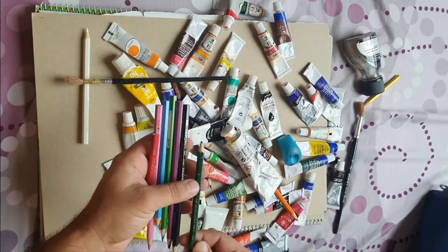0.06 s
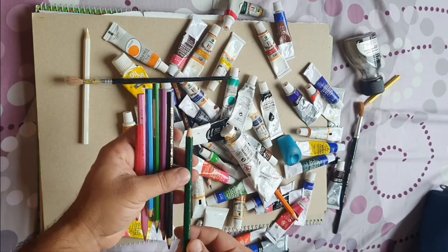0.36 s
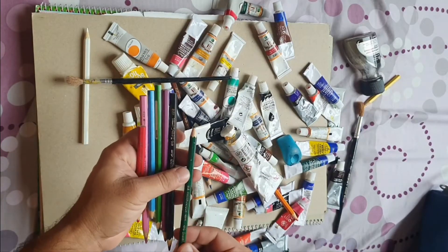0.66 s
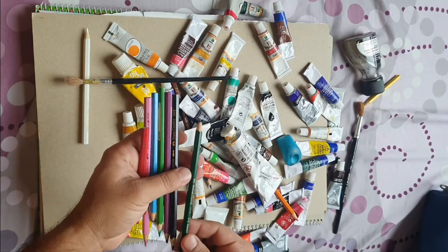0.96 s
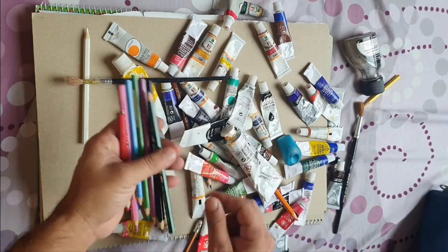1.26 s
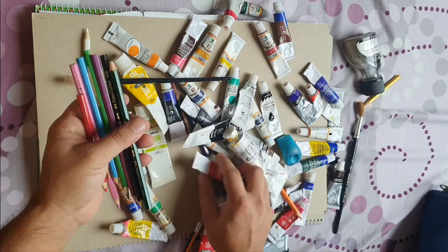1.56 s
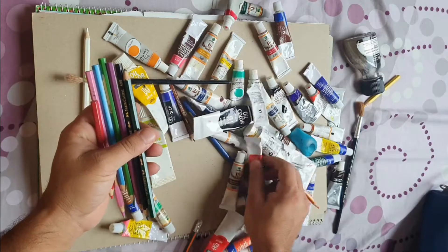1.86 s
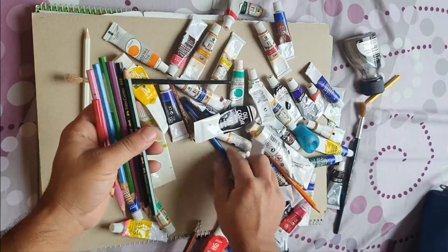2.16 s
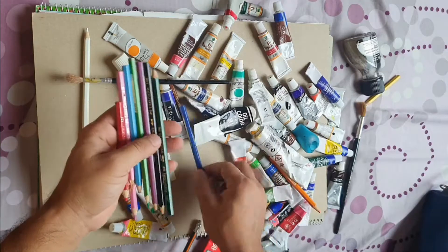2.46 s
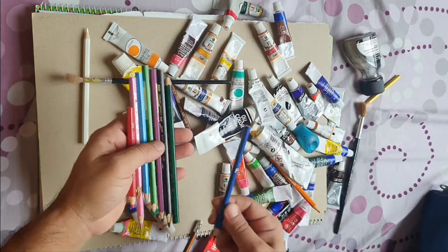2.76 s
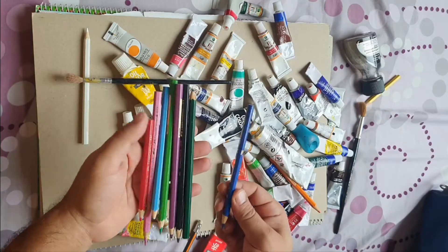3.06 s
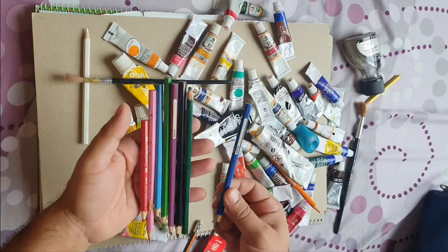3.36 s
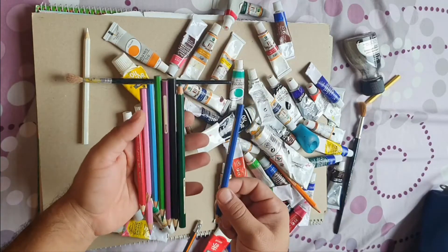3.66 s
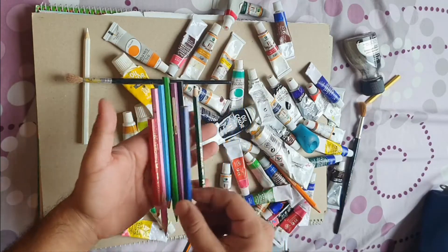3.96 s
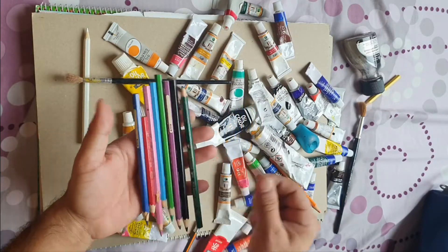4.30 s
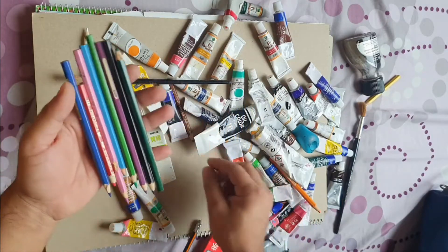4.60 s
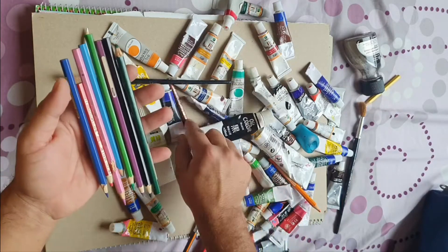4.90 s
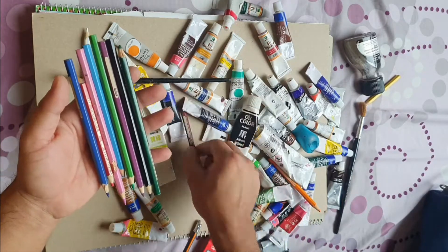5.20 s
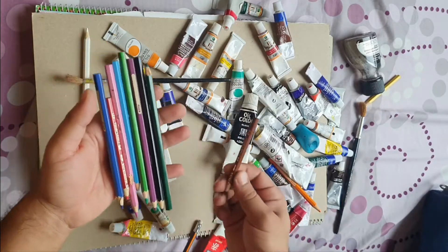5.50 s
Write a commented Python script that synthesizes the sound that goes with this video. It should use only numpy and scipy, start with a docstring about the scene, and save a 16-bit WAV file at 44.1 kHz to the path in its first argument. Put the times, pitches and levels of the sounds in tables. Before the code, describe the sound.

Close rummaging through foil paint tubes on a cardboard pad, with a few light pencil clicks and a low room hum.

```python
"""Sorting art supplies

A stereo microphone close over a sketch pad in a small, hard-walled room. Wooden pencils click together
in the palm. Twice the fingers dig through a heap of paint tubes: foil crinkles, caps tick, and the tubes
knock and scrape on the cardboard. Behind are a low hum, faint room resonances, air and a thin whistle."""
import sys
import numpy as np
from scipy import signal
from scipy.fft import rfft, irfft
from scipy.io import wavfile
from scipy.ndimage import uniform_filter1d

SR = 44100
rng = np.random.default_rng(int(sys.argv[2]) if len(sys.argv) > 2 else 0)


def digitize_waveform(pressure):
    """Quantize a signal to 16-bit integers and store it at the path in sys.argv[1].

    Rows of a 2-D input are taken as channels; values are limited to [-1, 1].
    """
    field = np.atleast_2d(pressure).T
    bounded = np.clip(field, -1, 1)
    quanta = np.round(bounded * 32767).astype(np.int16)
    wavfile.write(sys.argv[1], SR, quanta)


N = 253134
TOP_HZ = 15800  # upper edge of the recorder's band


def undb(db):
    """Decibels to amplitude."""
    return 10 ** (np.asarray(db) / 20)


def unit(x):
    """Scale to rms 1."""
    return x / np.sqrt(np.mean(x ** 2) + 1e-30)


def colour(x, points):
    """Shape x by (Hz, dB) points joined on a log-frequency axis."""
    hz, db = np.transpose(points)
    f = np.fft.rfftfreq(x.shape[-1], 1 / SR) + 1
    return irfft(rfft(x) * undb(np.interp(np.log(f), np.log(hz), db)), x.shape[-1])


def wander(rate_hz):
    """A slow random curve with a spread near 1."""
    hold = int(SR / rate_hz)
    steps = np.repeat(rng.standard_normal(N // hold + 1), hold)
    return 1.3 * uniform_filter1d(uniform_filter1d(steps, hold), hold)[:N]


def stereo(pair, split_hz, bass_side_db=-14):
    """Two unrelated signals become left and right: alike in the bass, unrelated above split_hz."""
    side = colour(pair[1], [(split_hz / 10, bass_side_db), (split_hz / 2, bass_side_db / 2), (split_hz, 0)])
    return np.array([pair[0] + side, pair[0] - side])


def stereo_noise(samples, split_hz, bass_side_db=-14):
    """Noise as the two sides of the microphone hear it."""
    return stereo(rng.standard_normal((2, samples)), split_hz, bass_side_db)


def ring(modes, t, phase=0):
    """Damped sines of (Hz, dB, t60) modes."""
    hz, db, t60 = np.transpose(modes)[:, :, None]
    return np.sum(undb(db - 60 * t / t60) * np.sin(2 * np.pi * hz * t + phase), axis=-2)


def place(out, start_s, hit, db, pan_db=0, window=176):
    """Add a stereo hit; db is its level with all its energy gathered into a 4 ms window."""
    i = int(start_s * SR)
    hit = hit / np.sqrt(np.sum(hit ** 2) / (2 * window)) * undb(db + np.array([[pan_db], [-pan_db]]) / 2)
    out[:, i:i + hit.shape[1]] += hit[:, :N - i]


# steady background tones, a low hum and faint room resonances: (frequency [Hz], level [dB])
BACKGROUND_TONES = [(48.8, -57), (96.5, -60), (160, -71), (212, -69.5), (287, -76), (603, -91), (632, -79),
                    (733, -93.5)]


def background_tones(waver_db=0.5, drift_rad=0.76):
    """A low hum and faint room resonances sound throughout, wavering slightly in level and phase."""
    t = np.arange(N) / SR
    return sum(np.sqrt(2) * undb(db + waver_db * wander(5))
               * np.sin(2 * np.pi * hz * t + drift_rad * wander(3.2)) for hz, db in BACKGROUND_TONES)


# spectrum of the room's still air: (frequency [Hz], relative level [dB])
AIR_SPECTRUM = [(20, -26.5), (48, 6), (90, 4), (132, -7), (160, 0), (215, -5.5), (270, -11), (460, -18.5),
                (630, -17), (900, -29.5), (1500, -37.5), (8000, -54.5), (12000, -50.5), (16000, -54.5)]


def still_air(rumble_db=-56, hiss_db=-84):
    """Room tone: a low rumble under a far fainter hiss."""
    rumble = colour(stereo_noise(N, split_hz=1200, bass_side_db=-10), AIR_SPECTRUM)
    hiss_spectrum = [(700, -40), (1150, 0), (1450, -19), (2600, -15), (3150, -8), (3700, -17), (8000, -35.5)]
    hiss = colour(rng.standard_normal((2, N)), hiss_spectrum)
    return undb(rumble_db) * unit(rumble) + undb(hiss_db) * unit(hiss)


# the whistle's slow fade: (time [s], level [dB])
WHISTLE_FADE = [(0, -80.5), (1.2, -80.5), (3, -82.5), (5.7, -89)]


def whistle(centre_hz=1755, half_width_hz=85):
    """Noise held in one narrow resonance makes a thin, airy whistle."""
    off_pitch = (np.fft.rfftfreq(N, 1 / SR) - centre_hz) / half_width_hz
    band = irfft(rfft(rng.standard_normal((2, N))) / (1 + off_pitch ** 4), N)
    return unit(band) * undb(np.interp(np.arange(N) / SR, *np.transpose(WHISTLE_FADE)))


def background(bass_pan_db=3):
    """Steady tones, air and whistle reach the microphone with the bass stronger on the left."""
    left, right = background_tones() + still_air() + whistle()
    return np.array([colour(left, [(90, bass_pan_db / 2), (250, 0.01)]),
                     colour(right, [(90, -bass_pan_db / 2), (250, 0.014)])])


# reverberation of the small room: (frequency [Hz], t60 [s], level [dB])
REVERB_BANDS = [(150, .3, -4), (600, .26, -3), (1500, .23, -4), (4000, .245, -1.5), (7000, .24, -1),
                (11000, .22, -1), (16000, .18, -2)]
# standing waves between the walls: (frequency [Hz], relative level [dB], t60 [s])
STANDING_WAVES = [(213.6, 0, 0.28), (228, -4.5, 0.15), (572, 5, .35), (610, 1.5, 0.25), (655, 2.5, 0.24),
                  (726, -6, .3), (876, -12, .3), (1194, 0, 0.21)]


def room(dry, build_s=0.014, standing_db=-58):
    """Reflections off near, hard walls die within a third of a second; a few standing waves ring out."""
    t = np.arange(SR // 2) / SR
    noise = stereo_noise(len(t), split_hz=1700, bass_side_db=-10.5) / np.sqrt(2)
    hz, t60, wet_db = np.transpose(REVERB_BANDS)
    log_f = np.log(np.fft.rfftfreq(len(t), 1 / SR) + 1)
    response = undb(standing_db) * ring(STANDING_WAVES, t)
    for share, decay_s, db in zip(np.eye(len(hz)), t60, wet_db):
        band = irfft(rfft(noise) * np.interp(log_f, np.log(hz), share), len(t))
        fade = np.exp(-np.log(1000) * t / decay_s) * np.minimum(t / build_s, 1)
        response = response + undb(db) * band * fade / np.linalg.norm(fade)
    return signal.fftconvolve(dry, response, axes=1)[:, :N]


# broad resonances of a pencil damped by the palm: (frequency [Hz], width [Hz], relative level [dB])
PENCIL_BODY = [(810, 220, -7), (2220, 230, -3), (3890, 140, 3), (4854, 600, -7.5), (6165, 400, -1),
               (7040, 280, -4), (7900, 600, -14), (8900, 440, -5.5), (10160, 490, -5), (12970, 2200, -8.5)]
# modes that ring on while a pencil lies loose: (frequency [Hz], relative level [dB], t60 [s])
LOOSE_MODES = [(3935, 0, .08), (6080, -2, .045)]
# pencil meets pencil:
# (time [s], relative level [dB], contact [ms], pitch [ratio], loose ring [dB], left minus right [dB])
PENCIL_CLICKS = [(1.3026, -32.5, 0.63, 1.05, -18.5, -5.5), (1.305, -29.5, 0.57, 1.006, -6, 1),
                 (1.319, -39.5, 1.9, 1.02, -8, 2), (3.5298, -72, .74, 1, -21, 0.5),
                 (3.636, -71, 3.3, 1.06, -7.5, 4), (3.91, -65, 3.3, 1, -8.5, 4),
                 (3.945, -57, 7, 1.05, -17, -2), (3.968, -56.5, 6.6, 1.05, -15, -1),
                 (4.3227, -54.5, 1.25, 1.07, -23, -5), (4.331, -56.5, 2.6, 0.84, -30, 5),
                 (4.4718, -60.5, 0.75, 1.05, -16, 2)]


def pencil_clicks(gain_db=-1, firm_top_hz=12630, firm_db=-26, db_per_octave=33.5, dulling=0.18):
    """Lacquered wood meets wood close by: a short gritty push sounds the body, and two modes ring on."""
    out, t = np.zeros((2, N)), np.arange(SR // 8) / SR
    hz, width, mode_db = np.transpose(PENCIL_BODY)[:, :, None]
    f = np.fft.rfftfreq(len(t), 1 / SR) + 1
    sign = np.where(np.arange(len(hz)) % 2, -1, 1)[:, None]  # neighbouring modes swing in opposition
    body = np.sum(sign * undb(mode_db) / (1 + 1j * (f ** 2 - hz ** 2) / (f * width)), axis=0)
    for start_s, db, contact_ms, pitch, ring_db, pan_db in PENCIL_CLICKS:
        age = 1000 * t / contact_ms  # in contact times
        push = stereo_noise(len(t), split_hz=2000) * age * np.exp(-age)
        wood = irfft(rfft(push) * np.interp(f / pitch, f, body), len(t))
        tail = unit(ring(LOOSE_MODES, t * pitch) * (1 - np.exp(-age)))
        click = np.array([unit(side) for side in wood]) + undb(ring_db) * tail
        # a harder, shorter touch is brighter
        top_hz = firm_top_hz * 2 ** ((db - firm_db) / db_per_octave) / contact_ms ** dulling
        soften = signal.butter(3, min(top_hz, TOP_HZ), fs=SR, output="sos")
        place(out, start_s, signal.sosfilt(soften, click), db + gain_db, pan_db)
    return out


def slips(per_s, spread_db, spectrum, split_hz):
    """A dense train of tiny slips of uneven size, coloured by what they shake."""
    size = undb(spread_db * np.minimum(rng.exponential(size=(2, N)), 4))
    clicks = (rng.random((2, N)) < per_s / SR) * size * rng.choice([-1, 1], (2, N))
    return unit(colour(stereo(clicks, split_hz), spectrum))


# spectra of scraped cardboard, crinkling tubes and sliding foil: (frequency [Hz], relative level [dB])
SCRAPE_SPECTRUM = [(100, -14), (205, 3), (330, -3.5), (480, -1.5), (700, 5.5), (900, -2), (1250, -4.5),
                   (1700, -10.5), (2600, -18.5), (5000, -41)]
CRINKLE_SPECTRUM = [(900, -19), (1900, 6), (2600, 3.5), (3400, 6), (4100, 3), (5000, -3.5), (6400, -4),
                    (8000, -21.5), (15000, -41)]
SLIDE_SPECTRUM = [(4000, -35), (7000, -4), (9500, 1), (12500, 4), (16000, -25)]
# fingers push into the heap, levels relative: (time [s], length [s], scrape [dB], crinkle [dB], slide [dB])
FINGER_PUSHES = [(1.637, .185, -41, -48, -64), (1.83, .035, -46.5, -49.5, -62),
                 (1.92, .06, -47, -49.5, -67.5), (2.013, .04, -49.5, -48.5, -66),
                 (2.058, .042, -43.5, -46.5, -61), (2.157, .035, -47, -54, -70.5),
                 (2.207, .06, -58, -64, -85.5), (2.304, .08, -50, -65, -80), (2.388, .085, -48, -51.5, -60),
                 (2.507, .09, -54.5, -57.5, -75), (4.859, .1, -59, -70, -95),
                 (4.968, .008, -54.5, -55, -62), (4.997, .022, -44, -56, -76.5),
                 (5.057, .038, -46, -54, -67), (5.111, .1, -57, -68.5, -79),
                 (5.21, .047, -46.5, -63, -74.5), (5.295, .105, -58.5, -61.5, -82)]


def tube_stirring(gain_db=-2, attack_s=0.016, release_s=0.016):
    """With each push tubes drag over the pad while their metal skins crinkle and slide on each other."""
    scrape = slips(per_s=1500, spread_db=4, spectrum=SCRAPE_SPECTRUM, split_hz=1700)
    crinkle = slips(per_s=800, spread_db=3.8, spectrum=CRINKLE_SPECTRUM, split_hz=3500)
    slide = slips(per_s=915, spread_db=4.5, spectrum=SLIDE_SPECTRUM, split_hz=4000)
    out, t = np.zeros((2, N)), np.arange(N) / SR
    for start_s, length_s, scrape_db, crinkle_db, slide_db in FINGER_PUSHES:
        attack = np.clip((t - start_s) / attack_s, 0, 1)
        release = np.exp(-np.clip((t - start_s - length_s) / release_s, 0, 20))
        friction = scrape * undb(scrape_db) + crinkle * undb(crinkle_db) + slide * undb(slide_db)
        out += attack * release * friction
    return undb(gain_db) * out


def jostles(count, scatter_db=3):
    """Chance contacts during the pushes, following their levels: (time [s], scrape [dB], crinkle [dB])."""
    start_s, length_s, scrape_db, crinkle_db, _ = np.transpose(FINGER_PUSHES)
    offset, size = rng.random((count, 2)).T
    ends_s = np.cumsum(length_s)  # the pushes laid end to end
    spent_s = (np.arange(count) + offset) / count * ends_s[-1]
    push = np.searchsorted(ends_s, spent_s)
    time_s = start_s[push] + length_s[push] - (ends_s[push] - spent_s)
    luck_db = scatter_db * (2 * size - 1)
    return np.transpose([time_s, scrape_db[push] + luck_db, crinkle_db[push] + luck_db])


# modes of the cardboard pad: (frequency [Hz], relative level [dB], t60 [s])
PAD_MODES = [(230, -10, 0.16), (293, -18, 0.038), (450, -1, 0.012), (603, 0.5, 0.0176), (708, 7.5, 0.038),
             (939, -4.5, 0.011), (1158, 1.5, 0.019), (1338, -12.5, 0.013), (1970, -26.5, 0.0074)]


def struck_pad(t, tilt_db_per_octave, pitch, scatter_db=4.5, phase_rad=0.45):
    """Hard contact favours the high modes; each reaches the microphone's two sides in its own phase."""
    hz, db, t60 = np.transpose(PAD_MODES)
    octaves = np.clip(np.log2(hz / np.median(hz)), -1, 2)
    db = db + tilt_db_per_octave * octaves + scatter_db * rng.standard_normal(len(hz))
    phase = phase_rad * rng.standard_normal((2, len(hz), 1))
    return ring(np.transpose([hz * pitch, db, t60]), t, phase)


# a tube drops or tips onto the pad, levels relative: (time [s], knock [dB], tilt [dB/octave], cap [dB])
TUBE_DROPS = [(1.6171, -47, -6, -57), (1.6504, -30, 19, -63), (1.7221, -41, 23, -52),
              (1.7339, -33.5, -22, -56), (1.7899, -29, -5, -33.5), (1.7976, -34, 3, -40),
              (1.8573, -35, 1.5, -41), (1.9207, -34, -6, -45.5), (1.9651, -43, 10, -53),
              (2.0059, -36, 1, -54), (2.1589, -31.5, -8, -40.5), (2.2377, -29.5, -6.5, -56),
              (2.3211, -43.5, -13, -63), (2.3692, -37, -1.5, -52.5),           (2.417, -29, 8.5, -41),
              (2.495, -33, -5.5, -59), (2.5029, -25.5, 2.5, -48), (2.5078, -31.5, -10.5, -73),
              (2.5515, -32.5, 15.5, -46.5), (4.8879, -45, -5, -52), (4.9056, -50, -2.5, -54.5),
              (4.9725, -43.5, 1, -57.5), (5.0207, -36.5, -22, -59), (5.1771, -40, -7, -64),
              (5.3802, -42, -7, -50.5)]


def tube_knocks(gain_db=-1, added_tilt=3, detune=0.066, rise_s=0.000163, bump_db=2):
    """Tubes drop on the pad and bump it during pushes; every spot of cardboard rings a bit differently."""
    out, t = np.zeros((2, N)), np.arange(SR // 10) / SR
    drops = [row[:3] for row in TUBE_DROPS]
    bumps = [(start_s, db + bump_db, 6 * rng.standard_normal()) for start_s, db, _ in jostles(22)]
    for start_s, db, tilt in drops + bumps:
        pitch = 1 + detune * rng.standard_normal()
        thud = struck_pad(t, tilt + added_tilt, pitch)
        place(out, start_s, thud * (1 - np.exp(-t / rise_s)), db + gain_db)
    return out


# resonances shared by all tubes and caps: (frequency [Hz], gain [dB])
TUBE_BODY = [(1400, 3), (2150, 3), (2600, -2), (3250, 4.5), (3850, -4.5), (4700, 4.5), (5800, 1),
             (7800, -2.5), (10000, 3.5)]
# a crease in a tube's foil snaps: (time [s], level [dB], centre [Hz], spread [octaves])
FOIL_SNAPS = [(1.6075, -60.5, 4330, .19), (1.7072, -44, 3950, 0.95), (1.8923, -39, 5160, 0.56),
              (2.0139, -37.5, 3400, 0.46), (2.0336, -43.5, 3400, .51), (2.152, -33.5, 4020, 0.35),
              (2.4024, -49, 5280, .75), (2.5371, -46.5, 3200, 0.2), (2.5992, -44, 3820, 0.44),
              (4.856, -54.5, 4350, 0.35), (5.0467, -33, 3330, 0.45), (5.086, -42.5, 3300, 0.67),
              (5.138, -52, 3780, 0.63), (5.301, -52.5, 3220, .2)]


def tube_ticks(rise_s=0.00027, snap_s=0.002, rattle_s=0.005, rattle_db=-25, skirt_db=-30,
               cap_hz=3400, cap_octaves=0.52, touch_db=3, touch_hz=3500, touch_octaves=0.44):
    """Creases snap, caps click, tubes touch: each a brief burst in a broad resonance, then a faint rattle."""
    out, t = np.zeros((2, N)), np.arange(SR // 20) / SR
    hz = np.geomspace(500, 16000, num=24)
    fade = (1 - np.exp(-t / rise_s)) * (np.exp(-t / snap_s) + undb(rattle_db) * np.exp(-t / rattle_s))
    caps = [(start_s, db, cap_hz, cap_octaves) for start_s, _, _, db in TUBE_DROPS]
    touches = [(start_s, db + touch_db, touch_hz * 2 ** (0.25 * rng.standard_normal()), touch_octaves)
               for start_s, _, db in jostles(36)]
    for start_s, db, centre_hz, octaves in FOIL_SNAPS + caps + touches:
        peak_power = np.exp(-(np.log2(hz / centre_hz) / octaves) ** 2 / 2)
        skirt_power = undb(skirt_db) ** 2 * np.minimum(hz / centre_hz, 1)
        spectrum = np.transpose([hz, 10 * np.log10((peak_power + skirt_power) / hz)])
        burst = colour(stereo_noise(len(t), split_hz=4700), spectrum)
        place(out, start_s, colour(burst, TUBE_BODY) * fade, db, pan_db=-1.3 + rng.standard_normal())
    return out


def scene(pencil_wet_db=1, tick_wet_db=-5, knock_wet_db=0, stir_wet_db=-2):
    """Each close sound sends a share into the room; the pencils, held in the open, send the largest."""
    sounds = [pencil_clicks(), tube_ticks(), tube_knocks(), tube_stirring()]
    shares = undb([pencil_wet_db, tick_wet_db, knock_wet_db, stir_wet_db])
    reflections = room(sum(share * sound for share, sound in zip(shares, sounds)))
    return sum(sounds) + reflections + background()


def record(dry):
    """The recorder cuts the top with a steep low-pass."""
    return signal.sosfilt(signal.ellip(10, 0.2, 70, TOP_HZ, fs=SR, output="sos"), dry)


dry = scene()
out = record(dry)
digitize_waveform(out)
```